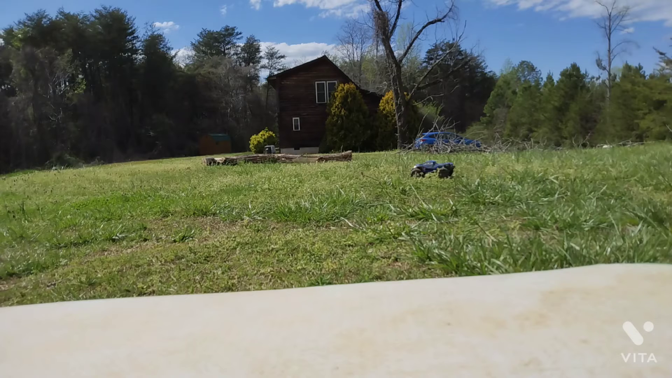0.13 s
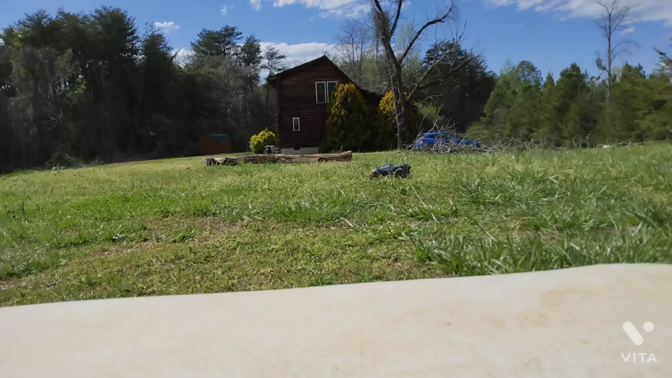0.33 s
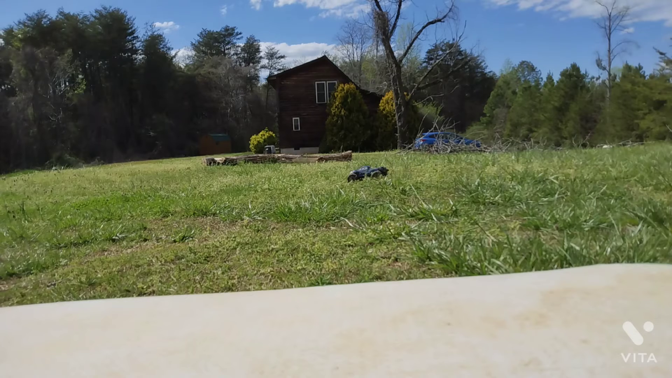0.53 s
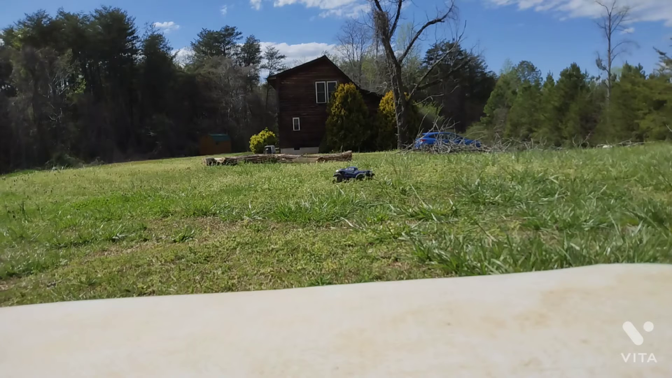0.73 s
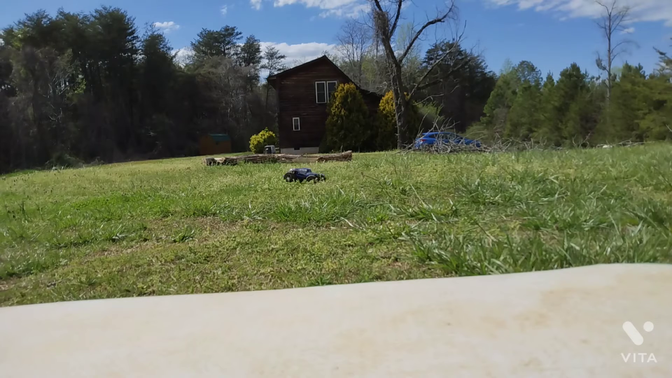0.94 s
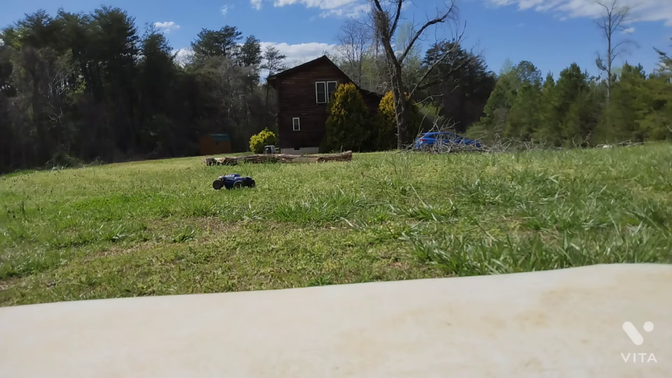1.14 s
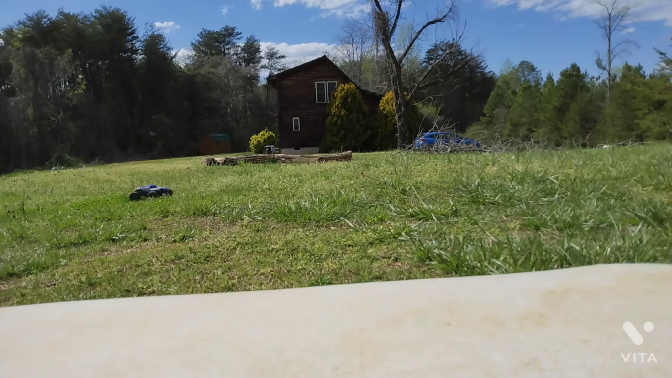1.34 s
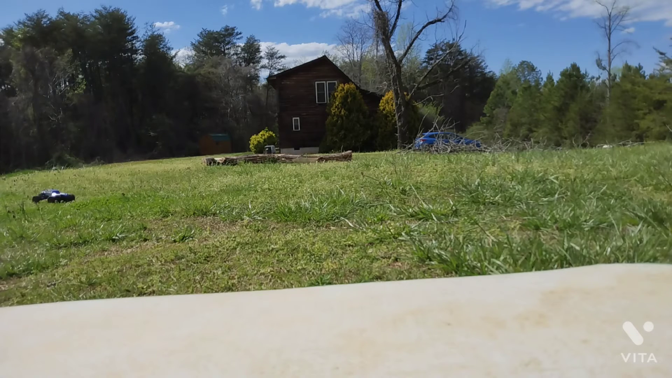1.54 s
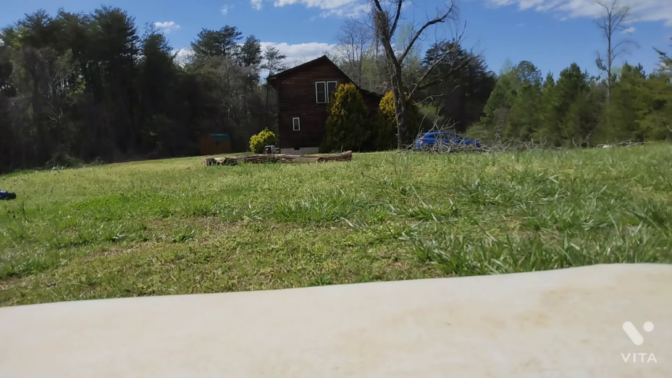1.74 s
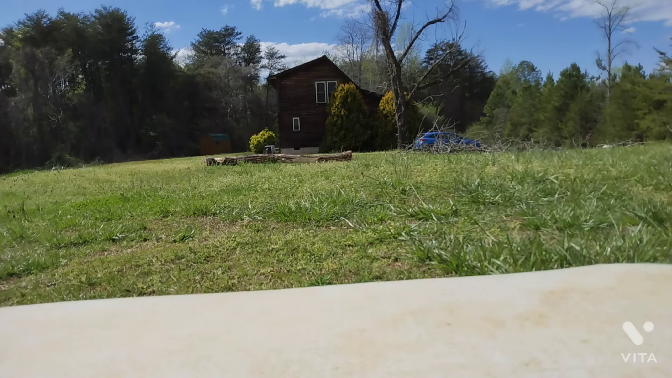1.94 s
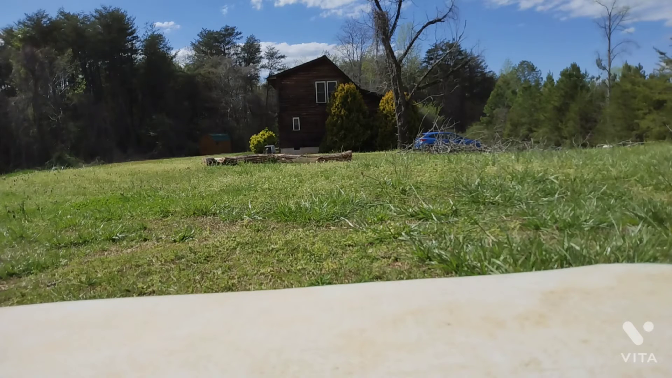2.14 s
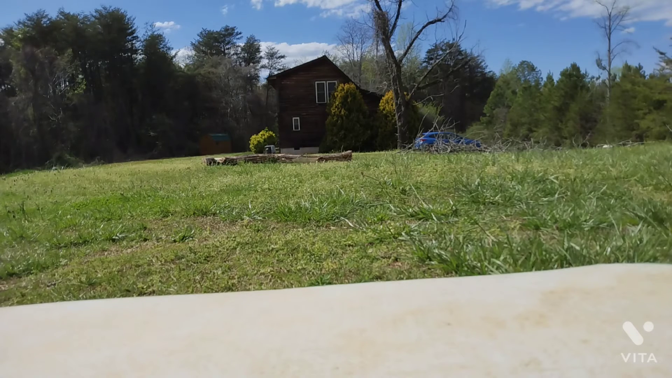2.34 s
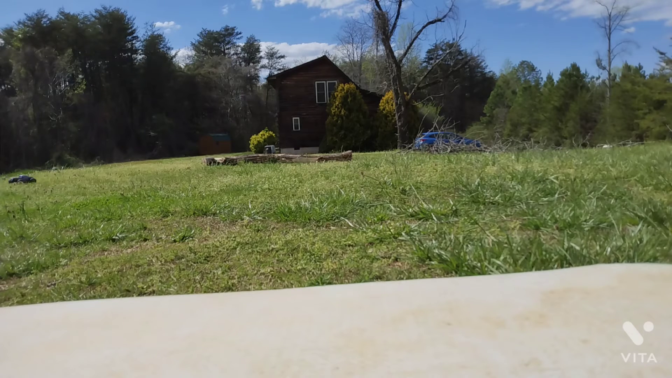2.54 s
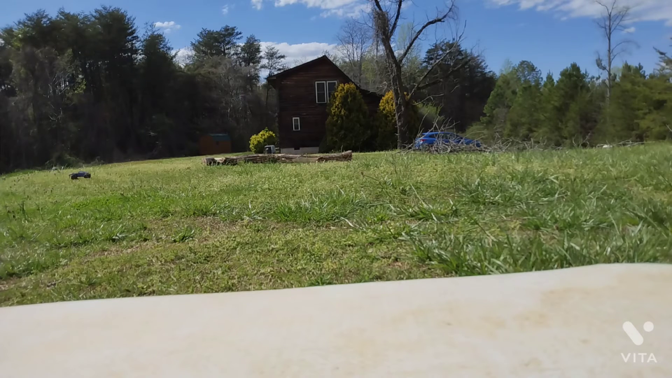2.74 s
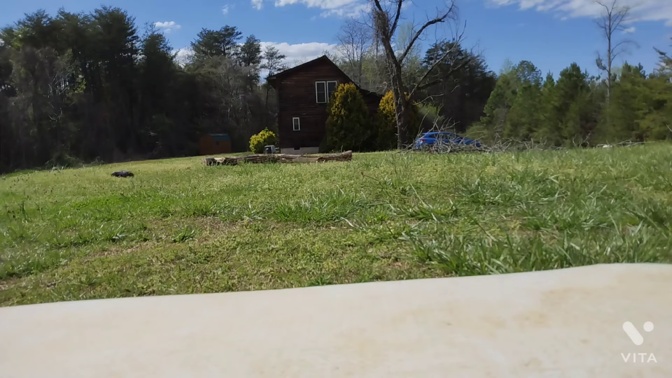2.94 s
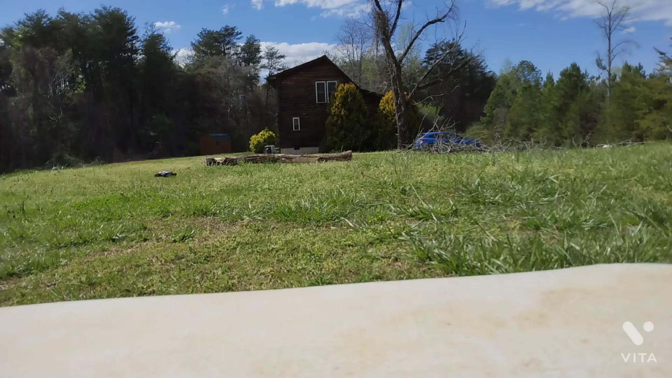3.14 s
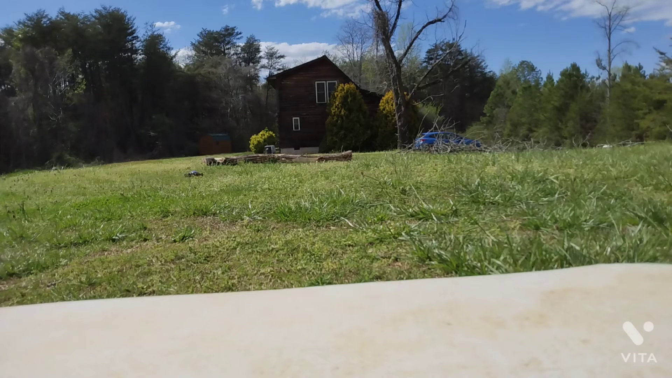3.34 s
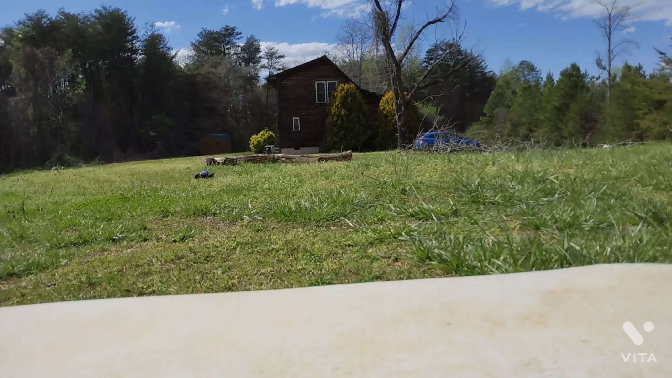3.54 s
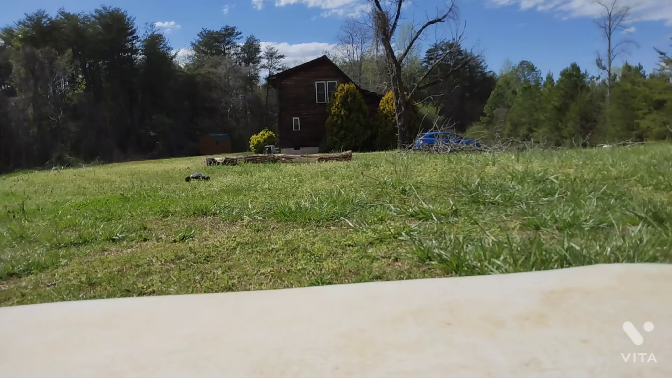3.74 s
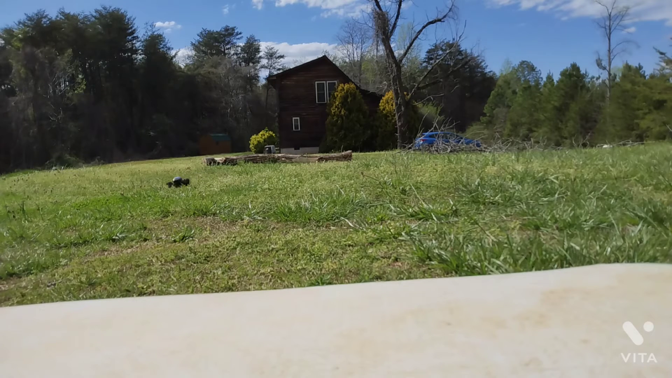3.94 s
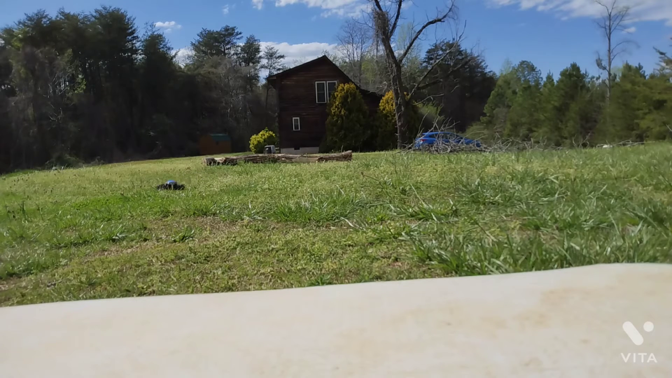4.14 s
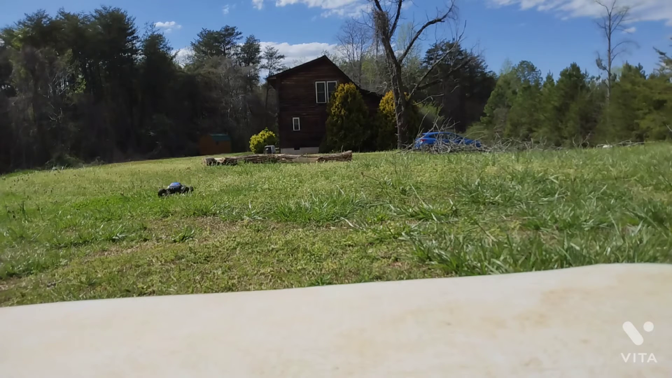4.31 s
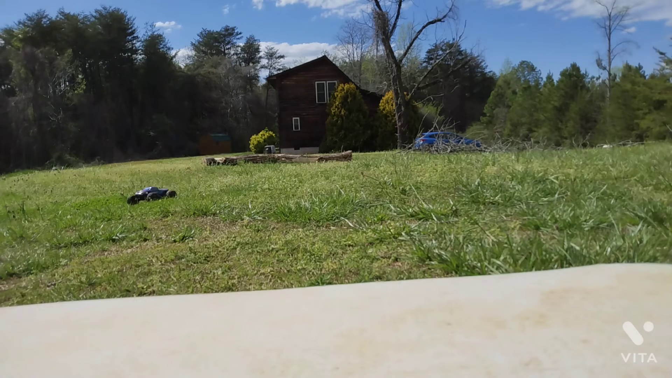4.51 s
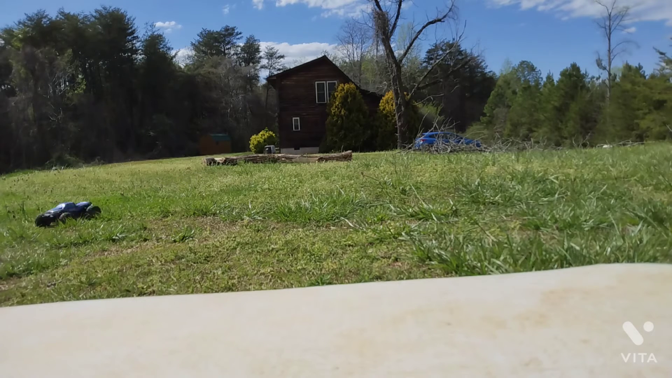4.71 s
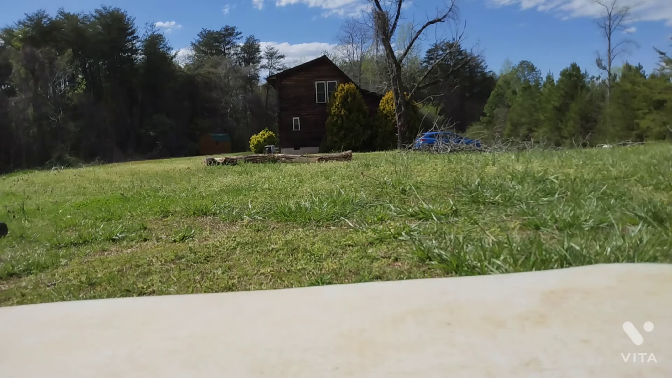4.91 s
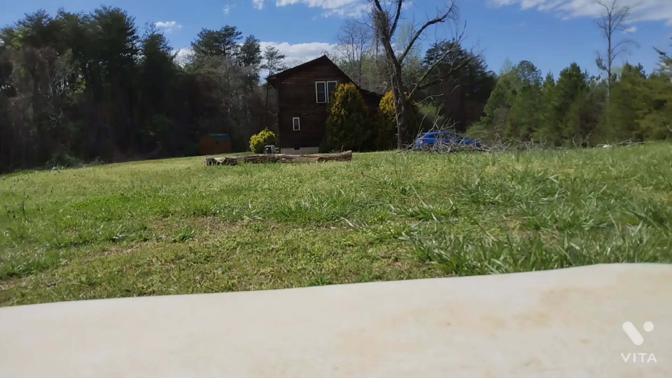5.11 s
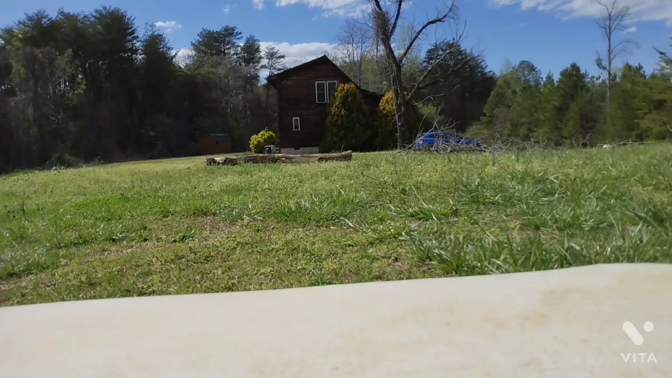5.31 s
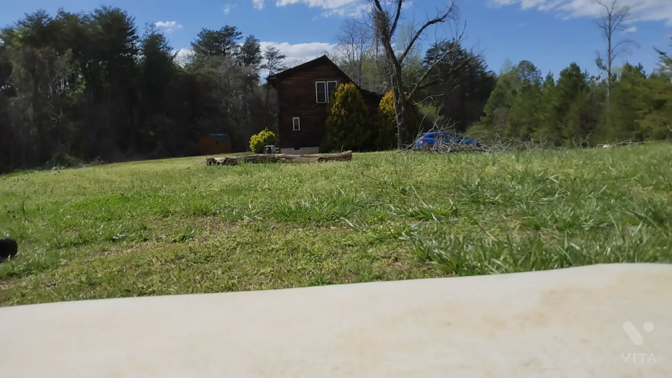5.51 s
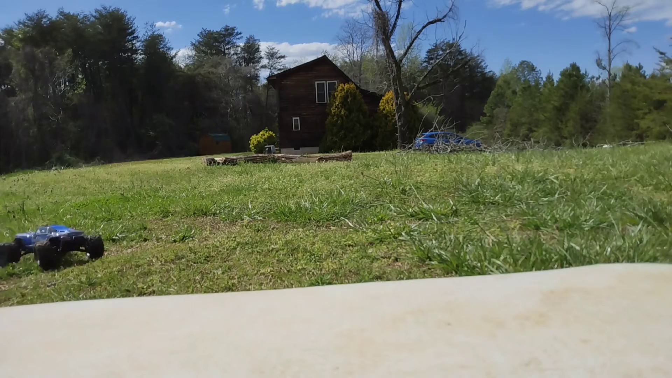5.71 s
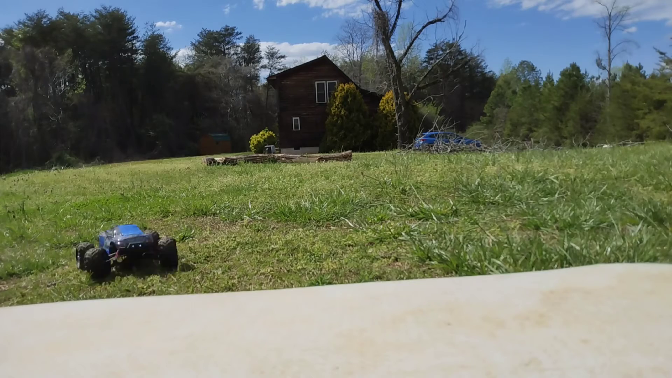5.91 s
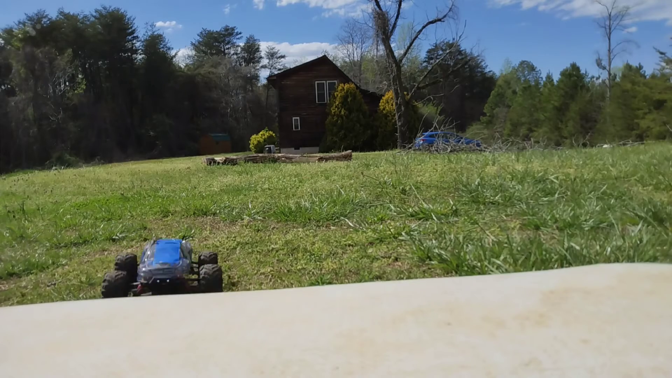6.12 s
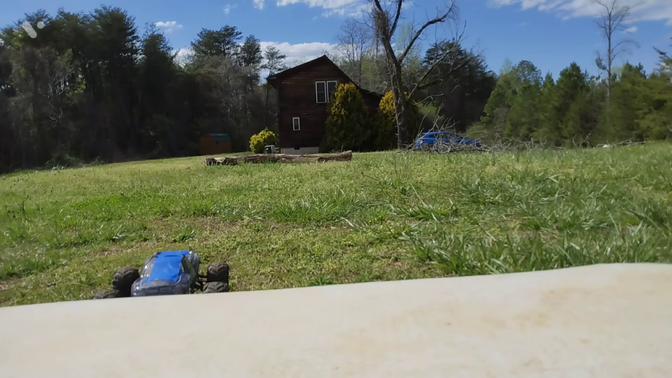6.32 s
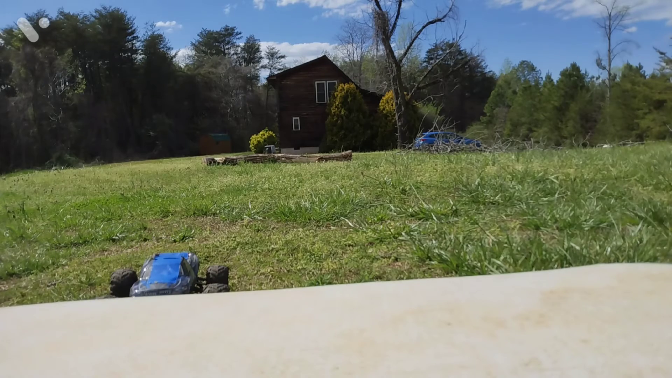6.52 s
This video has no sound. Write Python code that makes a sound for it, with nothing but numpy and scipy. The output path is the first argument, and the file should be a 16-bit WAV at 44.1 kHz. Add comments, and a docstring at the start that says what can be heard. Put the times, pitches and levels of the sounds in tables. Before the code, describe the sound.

A small remote-controlled truck whines and whirrs across a lawn, fades into the distance, then returns close with clacks, grass swish and wind thumps.

```python
"""A small electric truck loops over a lawn and stops in front of a camera with two microphone ports.
Its gears whine at the rate their teeth meet, inside a patchy whirr of noise and wavering tones.
Tyres drum and swish through the grass, filtered noise mixed with clicks; the plastic shell knocks
over bumps as decaying noise, and the steering servo sings in harmonics while it holds a turn.
Low noise and short flaps of wind buffet the ports, over a short echo and distant air in the trees."""
import sys
import numpy as np
from scipy import signal
from scipy.fft import rfft, irfft
from scipy.io import wavfile
from scipy.ndimage import uniform_filter1d, map_coordinates

SR = 44100
rng = np.random.default_rng(int(sys.argv[2]) if len(sys.argv) > 2 else 0)


def file_out(sig):
    """Save sig as 16-bit WAV at sys.argv[1]."""
    # one column per channel
    cols = np.atleast_2d(sig).T
    # limit, then scale
    lim = np.clip(cols, -1, 1)
    pcm = np.round(lim * 32767).astype(np.int16)
    wavfile.write(sys.argv[1], SR, pcm)


N = 293838
TIME = np.arange(N) / SR
FREQS = np.fft.rfftfreq(N, 1 / SR)
REFERENCE_M = 5  # distance at which the truck's levels are stated


def amp(db):
    """Decibel law: 20 dB is a tenfold amplitude."""
    return 10 ** (np.asarray(db) / 20)


def unit(x):
    """Normalisation to an rms of 1."""
    return x / np.sqrt(np.mean(x ** 2) + 1e-20)


def curves(rows):
    """Linear interpolation in time of each column of a table."""
    s, *columns = np.transpose(rows)
    return [np.interp(TIME, s, c) for c in columns]


def colour(x, points):
    """Spectral shaping along a curve of (Hz, dB) points; the result has rms 1."""
    hz, db = np.transpose(points)
    f = np.fft.rfftfreq(len(x), 1 / SR)
    gain = amp(np.interp(np.log(f + 1), np.log(hz), db))
    return unit(irfft(rfft(x) * gain, len(x)))


def wander(hz):
    """Low-passed noise: smooth random motion up to about a given rate, rms 1."""
    size, step = 16384, 20  # computed at one point per 20 samples
    f = np.fft.rfftfreq(size, step / SR)
    slow = irfft(rfft(rng.standard_normal(size)) / (1 + (f / hz) ** 4))
    return unit(np.interp(np.arange(N) / step, np.arange(size), slow))


def grains(per_s, spread_db):
    """Shot noise: random clicks, most small and a few large."""
    size = amp(spread_db * np.minimum(rng.exponential(1, N), 4))
    sign = rng.choice([-1, 1], N)
    struck = rng.random(N) < per_s / SR
    return unit(size * sign * struck)


def patchy(x, depth_db, size=(8, 4)):
    """Time-frequency modulation: random patches about 700 Hz wide and 12 ms long flare up by turns."""
    z = signal.stft(x, nperseg=512, noverlap=384)[2]
    field = rng.standard_normal(z.shape)
    for axis, length in enumerate(size):
        field = uniform_filter1d(field, length, axis=axis)
    flared = z * amp(depth_db * unit(field))
    return unit(signal.istft(flared, nperseg=512, noverlap=384)[1][:N])


def swell(start, length, attack_s, slope_db_per_s, release_s):
    """An envelope that rises linearly, drifts by a steady slope in dB, then dies away exponentially."""
    t = np.maximum(TIME - start, 0)
    release = np.exp(-np.maximum(t - length, 0) / release_s)
    return np.minimum(t / attack_s, 1) * amp(slope_db_per_s * t) * release


def follow(x, lag_s):
    """First-order inertia: the output approaches its control exponentially."""
    keep = np.exp(-1 / (lag_s * SR))
    return x[0] + signal.lfilter([1 - keep], [1, -keep], x - x[0])


def add(mix, s, sound):
    """Superposition of a short sound on the mix at a given time."""
    part = mix[max(round(s * SR), 0):][:len(sound)]
    part += sound[:len(part)]


# Moves of the throttle, each held until the next. Each row: start in seconds, tooth pitch asked for
# in Hz, gearbox level at the reference distance in dB, clear whine relative to that level in dB,
# treble at the reference distance in dB.
THROTTLE = [(0, 1262, -56.5, -19, -4.5), (.53, 479, -63.5, -38, -3), (.77, 519.9, -52, -29, -6),
            (.835, 2630, -41, -1.5, -7), (.925, 2615, -37, -6.5, -9.5), (1.049, 2204, -37.5, -5, -14),
            (1.26, 2951, -39, -8.5, -17.5), (1.63, 3013, -40.5, -8, -11.5), (1.848, 2970, -47, -13, -3.5),
            (2.031, 3100, -46.5, -24, -13), (2.281, 3193, -40, -34, -32), (3.149, 3130, -44, -27, -2),
            (4.001, 3156, -51.5, -40, 2), (4.517, 3240, -45.5, -6, -8), (4.72, 2402, -42, -11, -18),
            (4.88, 1210, -58, -24, -3), (5.118, 397.6, -80, -24, 2), (5.28, 1056, -58.5, -43, -1),
            (5.38, 1400, -48.5, -6.5, -4), (5.61, 1407, -52, -8.5, -3), (5.889, 1963, -47.5, -6, -3.5),
            (6.029, 907, -60, -19, -1), (6.24, 100, -79.5, -5, 4.5)]


def motor():
    """Inertia: pitch, loudness, clearness and brightness settle after each move of the throttle."""
    spin_lag_s, load_lag_s = .055, .027  # speed follows slowly, the strain on the gears quickly
    s, *columns = np.transpose(THROTTLE)
    move = np.maximum(np.searchsorted(s, TIME, side="right") - 1, 0)
    hz, *strain = (c[move] for c in columns)
    # first the rotor, then the whole truck has to gather speed
    mesh_hz = follow(follow(hz, spin_lag_s), spin_lag_s)
    return mesh_hz, *(follow(db, load_lag_s) for db in strain)


# Spectrum of the drivetrain's whirr. Each row: frequency in Hz, level in dB.
WHIRR = [(400, -16.5), (750, -9), (1170, -0.5), (1950, -2), (2450, 3), (3300, -4), (3900, -10), (4750, -16),
         (5600, -14.5), (8000, -22), (16000, -85)]


def gearbox(mesh_hz, level_db, clear_db, whirr_db=-4, strand_db=-3, flutter_db=3, patch_db=4.6):
    """Gear meshing: teeth meet at a pitch that shivers with load; the loose drivetrain whirrs around it."""
    shiver = .018 * wander(30) + .044 * wander(260)
    angle = 2 * np.pi * np.cumsum(mesh_hz * (1 + shiver)) / SR
    # the housing lets the overtone out only while it lies low enough
    housing = .5 / (1 + (2 * mesh_hz / 5400) ** 16)
    # an off-centre gear spreads the overtone into side tones
    overtone = housing * np.sin(2 * angle) * (1 + np.sin(angle / 8))
    flutter = amp(flutter_db * wander(30))
    whine = amp(clear_db) * unit((np.sin(angle) + overtone) * flutter)
    # slower gears add wavering tones that come and go and glide as the wheels grip and slip
    slow_angle = 2 * np.pi * np.cumsum(mesh_hz / 10 * (1 + .04 * wander(7))) / SR
    strands = sum(amp(4 * wander(10)) * np.cos(k * slow_angle + 2 * wander(20)) for k in range(2, 26))
    strands = unit(colour(strands, WHIRR) * np.sqrt(mesh_hz))
    noise = colour(rng.standard_normal(N), WHIRR)
    whirr = patchy(noise + amp(strand_db) * strands, depth_db=patch_db)
    # backlash makes the gears growl at low speed; at high speed they run smoothly
    slack = 1 / (1 + (mesh_hz / 2000) ** 4)
    backlash = amp(1.1 * slack * wander(110))
    return amp(level_db) * (whine + amp(whirr_db) * whirr) * backlash


def over_lawn(x, distance, treble_db, loss_db_per_m=1.4, corner_hz=1900):
    """Ground absorption: sound skimming the grass loses treble with every metre."""
    low = irfft(rfft(x) / (1 + (FREQS / corner_hz) ** 6), N)
    return low + (x - low) * amp(treble_db - loss_db_per_m * (distance - REFERENCE_M))


# Spectrum of the drumming tyres, also of the chassis thud. Each row: frequency in Hz, level in dB.
TYRES = [(100, 7), (220, -5), (420, -1), (700, 2), (1000, -9), (1600, -15.5), (3000, -12.5), (8000, -61)]


def tyres(mesh_hz, near_db, jolts_per_s=9, jolt_s=0.013):
    """Impact excitation: lugs drum on uneven turf and shake the hollow shell, harder at each tuft."""
    cruise_hz, cruise_db, db_per_doubling = 3000, -56, 6.5  # louder with speed
    level_db = cruise_db + db_per_doubling * np.log2(mesh_hz / cruise_hz) + near_db
    blows = rng.standard_normal(N) + 1.34 * grains(per_s=400, spread_db=1.5)
    tufts = rng.random(N) < jolts_per_s / SR
    jolts = signal.lfilter([1], [1, -np.exp(-1 / (jolt_s * SR))], tufts)
    return amp(level_db + 2.9 * wander(38.5)) * (1 + .5 * jolts) * colour(blows, TYRES)


# Spectrum of the swish in the grass. Each row: frequency in Hz, level in dB.
SWISH = [(1000, -76), (3500, 7.5), (6000, 6), (8500, 2.5), (13000, 5), (15500, 6.5)]
# Course of the swish. Each row: time in seconds, level in dB.
SWISH_LEVEL = [(.03, -67.5), (.36, -70), (.62, -82.5), (.86, -69), (1.17, -61.5), (2.12, -62.5),
               (3.04, -69.5), (3.9, -74.5), (4.58, -59.5), (4.76, -58), (5.11, -74.5), (5.32, -70),
               (5.9, -53), (6.23, -67.5), (6.62, -84)]


def grass():
    """Friction noise: blades whip the wheels and underside, a fine, fluttering hiss with ticks in it."""
    blades = rng.standard_normal(N) + .45 * grains(per_s=900, spread_db=4)
    flutter = amp(1.6 * wander(80))
    return amp(curves(SWISH_LEVEL)[0]) * flutter * patchy(colour(blades, SWISH), depth_db=3.0)


# Spectrum of a plastic clack, also of the ticks. Each row: frequency in Hz, level in dB.
CLACK = [(300, -0.5), (900, 7), (3500, 11.5), (5500, -1.5), (16000, -4)]
# Bumps that shake the shell. Each row: start in seconds, clack level before its decay in dB,
# thud of the chassis relative to the clack in dB.
KNOCKS = [(.482, -60, 8.5), (1.612, -42.5, -6), (1.687, -42, 2.5), (4.231, -68, 21), (4.752, -34, -2.5),
          (5.218, -46, -6.5), (6.027, -29.5, -6), (6.061, -31, -2), (6.136, -61, 16), (6.212, -60, 20.5),
          (6.298, -63, 18)]


def knocks(clack_t60=.04, thud_t60=0.078, rise_s=.0012):
    """Damped impact: each bump gives a short plastic clack and a duller, longer thud."""
    out, t = np.zeros(N), np.arange(SR // 5) / SR
    for s, db, thud_db in KNOCKS:
        a, b = rng.standard_normal((2, len(t)))
        clack = colour(a, CLACK) * amp(-60 * t / clack_t60)
        thud = colour(b, TYRES) * amp(thud_db - 60 * t / thud_t60)
        add(out, s, amp(db) * (clack + thud) * (1 - np.exp(-t / rise_s)))
    return out


# The steering servo holding a turn. Each row: start in seconds, length in seconds, attack in seconds,
# level in dB, multiple of the fundamental heard as overtone (a plain number).
SERVO = [(4.798, 0.33, 0.15, -48.5, 3), (5.614, .05, 0.019, -48, 3), (6.035, 0.43, 0.053, -58, 5),
         (6.127, 0.12, 0.029, -53, 5)]


def servo(fundamental_hz=896, fundamental_db=-14.5, overtone_db=-19):
    """Harmonic series: current pulses make the little motor sing; the overtone differs between turns."""
    angle = 2 * np.pi * np.cumsum(fundamental_hz * (1 + 0.0039 * wander(140))) / SR
    core = amp(fundamental_db) * np.sin(angle) + np.sin(2 * angle)  # the second multiple leads
    song = np.zeros(N)
    for s, length, attack_s, db, k in SERVO:
        tone = unit(core + amp(overtone_db) * np.sin(round(k) * angle))
        song += amp(db) * swell(s, length, attack_s, slope_db_per_s=-11.5, release_s=.052) * tone
    return song * amp(2 * wander(34))


def squeal(hz=5190, db=-64):
    """Magnetic vibration: the stalled motor's windings squeal briefly before it turns."""
    gate = np.interp(TIME, [5.34, 5.355, 5.395, 5.41], [0, 1, 1, 0])
    angle = 2 * np.pi * np.cumsum(hz * (1 + 0.014 * wander(324))) / SR
    return amp(db) * gate * np.sin(angle)


# Spectrum of crackling stalks. Each row: frequency in Hz, level in dB.
CRUNCH = [(300, -2), (900, -6), (1800, 3.5), (2700, -14), (5000, -44)]
# Course of the crackle. Each row: time in seconds, level in dB.
CRUNCH_LEVEL = [(3.4, -80), (3.85, -64), (4.4, -58.5), (4.72, -46.5), (5.1, -55), (5.25, -92)]
# The gears' high rasp. Each row: time in seconds, level in dB, centre of the band in Hz.
RASP_BAND = [(5.3, -97, 4500), (5.56, -57.5, 4700), (5.8, -64, 4900), (5.92, -54, 4650), (5.98, -58, 3550),
             (6.05, -39.5, 3450), (6.17, -99, 3450)]


def close_by(rasp_half_width_hz=450):
    """Shot noise and a modulated carrier: near stalks crackle, and gears rasp in a band that falls late."""
    crackle = patchy(colour(grains(per_s=700, spread_db=2), CRUNCH), depth_db=5.0)
    rasp_db, centre_hz = curves(RASP_BAND)
    angle = 2 * np.pi * np.cumsum(centre_hz) / SR
    band = wander(rasp_half_width_hz) * np.cos(angle) + wander(rasp_half_width_hz) * np.sin(angle)
    rasp = unit(band * amp(3.5 * wander(100)))
    return amp(curves(CRUNCH_LEVEL)[0]) * crackle + amp(rasp_db) * rasp


# The truck's way, out to the far lawn and back. Each row: time in seconds, distance in metres,
# lead of the left port in milliseconds.
PATH = [(0, 6.8, -0.14), (.85, 7.24, -0.048), (1.28, 4.98, 0.095), (1.85, 5.36, 0.27), (2.1, 8.4, .31),
        (2.5, 18.6, 0.28), (3.25, 23.3, 0.14), (3.9, 17.5, 0.13), (4.35, 6.4, 0.16), (4.68, 4.5, 0.14),
        (4.9, 3.4, 0.28), (5.25, 4.25, 0.33), (5.7, 2.22, 0.29), (6.0, 1.78, 0.21), (6.17, 1.54, 0.18)]


def route():
    """Kinematics: distance and lead of the left port move in straight lines between waypoints."""
    return curves(PATH)


def ports(x, lead_ms):
    """Interaural-style time difference: the nearer port hears the truck a little earlier."""
    shift = lead_ms / 1000 * SR / 2  # half the lead, in samples, for each port
    return np.array([map_coordinates(x, [np.arange(N) + side * shift], order=3, mode="nearest")
                     for side in (1, -1)])


# Spectrum of a clump of dry grass. Each row: frequency in Hz, level in dB.
TUFT = [(2000, -17), (3200, 10), (5500, 2.5), (12000, 1)]
# Short rustles in the grass. Each row: time of the peak in seconds, peak level in dB.
RUSTLES = [(2.84, -69), (2.959, -67), (3.056, -67), (3.662, -64)]


def rustles(length_s=0.029):
    """Granular noise: clumps of dry grass give short rustles that grow and fade exponentially."""
    level = sum(amp(db) * np.exp(-abs(TIME - s) / length_s) for s, db in RUSTLES)
    return level * colour(grains(per_s=3000, spread_db=4), TUFT)


# Small dry ticks right at the camera. Each row: start in seconds, level before the decay in dB.
TICKS = [(0.299, -53), (3.663, -49), (4.07, -42), (6.5, -51.5), (6.54, -51.5)]


def ticks(t60=.02, rise_s=.0005):
    """Damped impact: sharp little ticks, too close to differ between the ports."""
    out, t = np.zeros(N), np.arange(SR // 10) / SR
    for s, db in TICKS:
        snap = colour(rng.standard_normal(len(t)), CLACK) * (1 - np.exp(-t / rise_s))
        add(out, s, amp(db - 60 * t / t60) * snap)
    return out


def trees(x, t60=0.2, rise_s=.0057):
    """Diffuse reflection: house and tree line scatter a short echo, different at each port."""
    t = np.arange(SR) / SR
    spectrum = [(200, 9.0), (1200, -6.0), (3000, 2.5), (9000, 4.0)]  # Hz, dB
    envelope = amp(-60 * t / t60) * (1 - np.exp(-t / rise_s))
    tails = [colour(rng.standard_normal(SR), spectrum) * envelope for side in "LR"]
    return np.array([signal.fftconvolve(x, tail / np.linalg.norm(tail))[:N] for tail in tails])


# Spectrum of the wind's rumble. Each row: frequency in Hz, level in dB.
RUMBLE = [(25, -18), (40, -21), (60, 2), (90, 5.5), (160, -7), (260, -21), (500, -29.5), (5000, -66)]
# Gusts on the ports. Each row: start in seconds, length in seconds, left level in dB, right level in dB.
GUSTS = [(0.5, 0.79, -51.5, -52), (1.393, 0.27, -49.5, -38), (1.683, 0.31, -43.5, -41.5),
         (2.335, .37, -57.5, -57), (4.269, 0.38, -42.5, -38), (4.66, .45, -46.5, -45),
         (5.295, 0.518, -48.5, -50), (5.757, 0.29, -35.5, -35.5), (6.013, 0.2, -41.5, -65),
         (6.456, 0.26, -42.5, -34.5)]
# Level between gusts: left in dB, right in dB.
BREEZE_DB = (-63.5, -61)
# Single eddies hitting a port. Each row: time in seconds, peak of the envelope in dB,
# port (0 left, 1 right).
BUFFETS = [(.471, -23, 1), (1.461, -18.5, 1), (1.558, -24, 1), (1.812, -32, 1), (1.979, -30, 0),
           (2.988, -34.5, 1), (3.97, -33.5, 1), (4.321, -24, 1), (4.927, -21.5, 1), (5.42, -21, 0),
           (5.768, -16.5, 1), (5.795, -17, 1), (6.488, -17, 1), (6.539, -13, 1)]


def wind(flap_s=.0047 / 2.27):
    """Turbulent pressure: each port rumbles on its own; single eddies give a short low flap."""
    # a gust grows slightly while it is held
    gusts = [np.outer(amp(db), swell(s, length, attack_s=.019, slope_db_per_s=5, release_s=.028))
             for s, length, *db in GUSTS]
    strength = np.sqrt(amp(BREEZE_DB)[:, None] ** 2 + sum(gust ** 2 for gust in gusts))
    out = strength * np.array([colour(rng.standard_normal(N), RUMBLE) for side in "LR"])
    out = out * amp(2.5 * np.array([wander(18), wander(18)]))
    t = np.arange(-SR // 20, SR // 20) / SR
    for s, db, port in BUFFETS:
        eddy_hz = rng.uniform(63, 114.45)
        flap = np.cos(2 * np.pi * (eddy_hz * t + rng.random()))
        add(out[round(port)], s + t[0], amp(db) * flap / np.cosh(t / flap_s))
    return out


# Spectrum of the yard's air. Each row: frequency in Hz, level in dB.
YARD = [(25, 8.5), (100, 12), (650, -8.5), (1200, -10), (2500, -16.5), (5500, -15.5), (15500, -28.5)]


def yard():
    """Partial coherence: distant air in the trees is mostly common to both ports."""
    common, left, right = (colour(rng.standard_normal(N), YARD) for part in "CLR")
    return amp(-67.5) * (common + 0.22 * np.array([left, right]))


def scene():
    """Superposition: the truck on its way, in the yard and the wind."""
    distance, lead_ms = route()
    mesh_hz, gear_db, clear_db, treble_db = motor()
    near_db = 20 * np.log10(REFERENCE_M / distance)  # inverse distance law
    gears = over_lawn(gearbox(mesh_hz, gear_db + near_db, clear_db), distance, treble_db)
    truck = gears + tyres(mesh_hz, near_db) + close_by() + knocks() + servo() + squeal()
    # the swish below about 6.5 kHz reaches the ports with the truck's lead; above that it sounds alike in both
    swish, centred_above_hz = grass(), 6520
    body = irfft(rfft(swish) / (1 + (FREQS / centred_above_hz) ** 20), N)
    direct = ports(truck + body, lead_ms) + swish - body
    # the nearer the truck, the drier it sounds
    truck_echo = amp(-10) * np.sqrt(distance / REFERENCE_M) * truck
    echo = trees(truck_echo + amp(-25) * swish)
    return direct + echo + rustles() + ticks() + wind() + yard()


# Hollow resonances of the camera case. Each row: centre in Hz, width in Hz, lift in dB.
CASE = [(650, 130, 8), (1210, 230, 5), (1560, 160, 2.5)]


def record(dry):
    """Resonance and band limits: the case colours, the microphone drops deepest bass and top treble."""
    lift_db = sum(db / (1 + (2 * (FREQS - hz) / width) ** 2) for hz, width, db in CASE)
    low_cut = 1 - 1 / (1 + (FREQS / 33) ** 4)
    coloured = irfft(rfft(dry) * low_cut * amp(lift_db - 0.87), N)
    band_limit = signal.firwin(511, 16000, window=("kaiser", 9), fs=SR)  # edge in Hz
    return signal.oaconvolve(coloured, band_limit[None], "same")


dry = scene()
out = record(dry)
file_out(out)
```